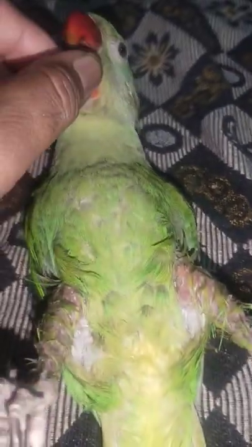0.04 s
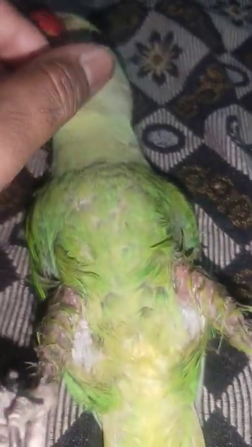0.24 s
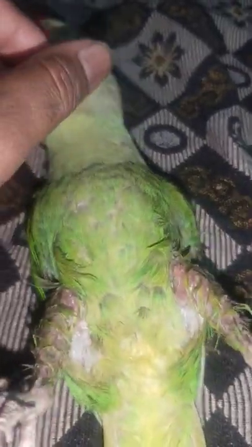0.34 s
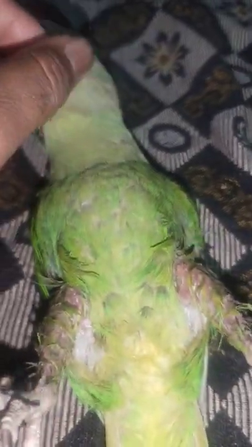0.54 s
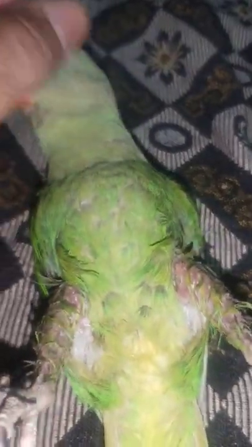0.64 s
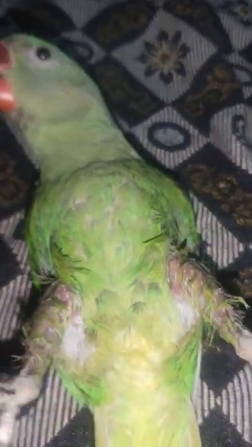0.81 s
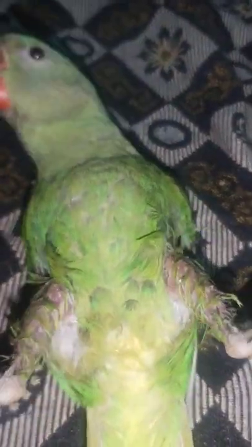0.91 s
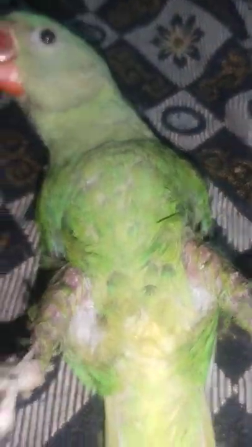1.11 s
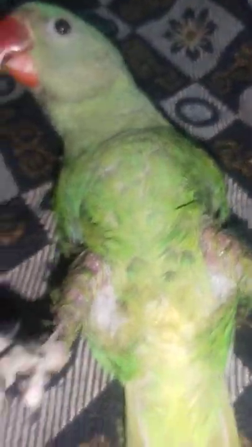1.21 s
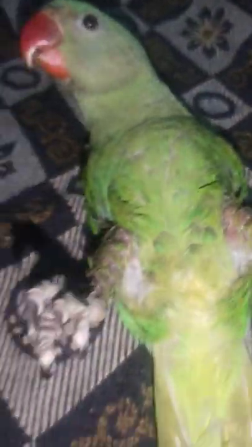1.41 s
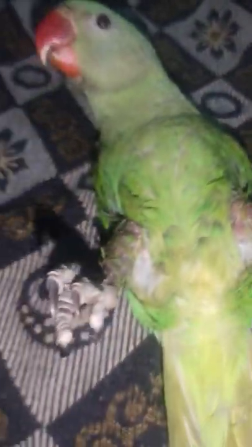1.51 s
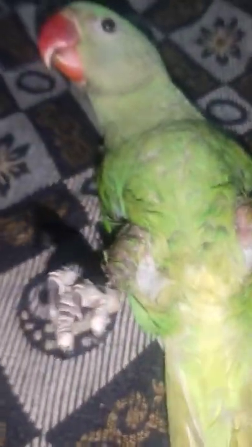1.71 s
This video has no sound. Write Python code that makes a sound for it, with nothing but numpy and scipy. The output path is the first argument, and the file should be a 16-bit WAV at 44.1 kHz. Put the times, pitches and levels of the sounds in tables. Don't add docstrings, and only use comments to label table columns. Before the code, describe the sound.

After a brief stretch of low room rumble, a parrot close to the microphone lets out one shrill, rough trilling squawk that breaks upward early, sags and stops abruptly, leaving a short room tail, soft cloth rubbing and faint distant chirps.

```python
import sys
import numpy as np
from scipy import signal
from scipy.fft import rfft, irfft
from scipy.io import wavfile
from scipy.ndimage import uniform_filter1d, map_coordinates

SR = 44100
rng = np.random.default_rng(int(sys.argv[2]) if len(sys.argv) > 2 else 0)


def ratio(d):
    e = np.asarray(d, float) / 20
    return 10 ** e


def waveform_to_disk(signal):
    frames = np.transpose(np.atleast_2d(signal))
    scaled = np.clip(frames, -1, 1) * 32767
    samples = np.round(scaled).astype(np.int16)
    wavfile.write(sys.argv[1], SR, samples)


N = 77175

# frequency_hz, density_db_per_hz
RUMBLE_SPECTRUM = [(40, -20.5), (84, 0.64), (290, -7), (1230, -10.5), (1450, -19.5), (2900, -31.5),
                   (7000, -46.5), (15500, -66)]
# frequency_hz, correlation (-1 to 1)
PORT_CORRELATION = [(60, -0.6), (130, 0.7), (290, 0.88), (640, -0.22), (1400, -0.41), (3000, 0.69),
                    (15000, -0.34)]
# frequency_hz, difference_db
PORT_LEAN = [(60, 6.5), (110, -10), (200, -2.3), (400, 3.5), (1300, 0.9), (4400, 5), (15000, 10)]
# frequency_hz, gain_db
DUCK_DEPTH = [(40, -2.5), (90, -8), (200, -16.5), (400, -20.5), (900, -15.5), (3000, -42.5), (15000, -1)]
# centre_s, length_s, level_db
RUSTLES = [
    (.1, .3, -72),
    (1.3, 0.61, -61.5),
    (1.72, 0.21, -65.5),
]
DIPS_S = [.195, .231, .269, .305, .341, .377, .413, .449, .486, .523, .561, .600, .638, .676, .714, .753,
          .793, .831, .870, .911, .945, .985]
# time_s, low_pitch_hz, high_pitch_hz, level_db, crest_level_db, crest_overtones_db,
# dip_narrowness (exponent), brightness_db (per harmonic), left_minus_right_db
VOICE = [
    (.215, 1340, 1740, -32, -2, -5, 1.0, -1, 0),
    (.262, 1580, 2350, -27, -9, -24, 2.4, 1, 0),
    (.33, 1520, 2600, -24, -16, -16, 2.8, 1, 0),
    (.352, 1480, 2330, -24, 1, -14, 2.2, 0, 0),
    (.47, 1325, 2150, -23, 0.1, -1.5, 1.1, 0.1, 0.1),
    (.60, 1280, 1990, -23, 0.1, 0.1, 1.1, 0.1, 0.1),
    (.76, 1225, 1820, -24, 0.1, 0.1, 1.15, 1.1, 0.1),
    (.89, 1200, 1670, -28, 0, 0, 1.25, 4, 3),
    (.95, 1080, 1500, -29, 0.1, 0.1, 1.2, 4.1, 3.5),
]
HARMONICS_DB = [-1, 1.9, -8.5, -16.5, -43, -22]
# frequency_hz, gain_db
FUNDAMENTAL_RESPONSE = [
    [(1100, 0.5), (1400, -4.5), (1700, -3.5), (2050, -3.2), (2350, 8)],
    [(1100, 5), (1400, -10), (1700, 6), (2000, 11), (2300, 12)],
]
# frequency_hz, gain_db
OVERTONE_RESPONSE = [
    [(2300, 0.5), (2700, -3), (3400, -1.5), (4000, -3.5), (4500, -2), (5500, -6), (6500, -1.5), (8000, -34)],
    [(2300, 3.8), (2700, 5), (3200, -4.5), (3800, 8), (4400, 0), (5500, -1), (6500, -10), (8000, -19)],
]
# frequency_hz, density_db_per_hz
AIR_SPECTRUM = [(1000, -85), (1500, -24.5), (4000, -8.5), (7300, -17), (8200, -24), (11000, -34.5),
                (15000, -35)]
# centre_s, length_s, pitch_hz, level_db, overtone_db
SQUEAKS = [
    (.294, .015, 2830, -16.5, -24),
    (.328, .017, 2830, -14.5, -20),
]
# centre_s, length_s, pitch_hz, level_db
CHIRPS = [
    (1.383, 0.035, 1894, -52),
    (1.575, 0.03, 1950, -60),
    (1.611, 0.094, 2660, -58),
    (1.67, 0.11, 1826, -54.5),
]

RUMBLE_DB, SWELL_DB, FLICKER_DB = -36.5, 1.0, 1.5
GUST_DB, GUST_TOP_HZ = 1.5, 190
HUM_HZ, HUM_WIDTH_HZ, HUM_DB = 372.8, 45, -43.5
DUCK_START_S, DUCK_IN_S, DUCK_END_S, DUCK_OUT_S = 0.18, 0.18, 0.903, 0.15
BASS_LATE_S, BASS_IN_S = 0.14, 0.079
RUSTLE_HZ, RUSTLE_WIDTH_HZ, RUSTLE_DB = 6640, 3100, 2.5
START_S, END_S, ATTACK_S, RELEASE_S = .215, .945, .002, .002
JITTER, SHIMMER_DB = .004, 1.0
SQUARE, SKEW, SKEW_PER_S = 1.1, .05, .6
FALL_DB_PER_S = 8
AIR_DB, AIR_LEFT_DB, AIR_APART = -11, -3.5, 1
AIR_PULSE, AIR_STEADY_S = .5, .33
SQUEAK_SAG_HZ_PER_S = 14000
LAG_S, TURNED_LAG_S, TURN_S, TURN_LENGTH_S = 0.00027, 0.00023, 0.698, 0.21
BED_ECHO_S, BED_ECHO_DB = (0.001016, 0.001687), -16.5
ROOM_DB, ROOM_DELAY_S, ROOM_T60_S, ROOM_TOP_HZ = (-13.5, -15.5), 0.0098, 0.63, 6500
PATCH_FROM_HZ, PATCH_WIDTH_HZ, PATCH_S, PATCH_EDGE, PATCH_DB = 7800, 450, .09, .1, -25
TOP_HZ = 15700


def level(x, db):
    return x * ratio(db) / np.sqrt(np.mean(x ** 2))


def read(table, hz):
    table = np.array(table, float)
    return np.interp(np.log(np.maximum(hz, 1)), np.log(table[:, 0]), table[:, 1])


def ramp(start_s, length_s):
    progress = np.clip((np.arange(N) / SR - start_s) / length_s, 0, 1)
    return np.sin(np.pi / 2 * progress) ** 2


def arc(centre_s, length_s):
    return np.cos(np.pi * np.clip((np.arange(N) / SR - centre_s) / length_s, -.5, .5))


def walk(rate):
    k = int(SR / rate)
    return level(uniform_filter1d(uniform_filter1d(rng.standard_normal(N), k), k), 0)


def band(hz, width_hz):
    bell = np.exp(-.5 * ((np.fft.rfftfreq(N, 1 / SR) - hz) / width_hz) ** 2)
    return level(irfft(rfft(rng.standard_normal(N)) * bell, N), 0)


def rumble():
    duck = ramp(DUCK_START_S, DUCK_IN_S) * (1 - ramp(DUCK_END_S, DUCK_OUT_S))
    bass_onset = ramp(DUCK_START_S + BASS_LATE_S, BASS_IN_S)
    swell, gust = walk(9), walk(23)
    steady, ducked = 0, 0
    for hz in 25 * 2 ** (np.arange(29) / 3):
        bass = hz < GUST_TOP_HZ
        correlation = np.clip(read(PORT_CORRELATION, hz), -.99, .99)
        mid = np.sqrt(1 + correlation) * band(hz, hz / 9)
        side = np.sqrt(1 - correlation) * band(hz, hz / 9)
        lean = ratio(read(PORT_LEAN, hz) / 2)
        pair = np.array([(mid + side) * lean, (mid - side) / lean])
        pair = pair * np.sqrt(hz)
        motion_db = SWELL_DB * swell + FLICKER_DB * walk(4) + GUST_DB * gust * bass
        pair = pair * ratio(read(RUMBLE_SPECTRUM, hz) + motion_db)
        depth = duck * bass_onset if bass else duck
        gain = ratio(read(DUCK_DEPTH, hz) * depth)
        steady = steady + pair
        ducked = ducked + pair * gain
    hum = band(HUM_HZ, HUM_WIDTH_HZ / 2) * ratio(HUM_DB + read(DUCK_DEPTH, HUM_HZ) * duck)
    return ducked * ratio(RUMBLE_DB) / np.sqrt(np.mean(steady ** 2)) + hum


def cloth_rustles():
    swell = sum(ratio(db) * arc(s, length) ** 2 for s, length, db in RUSTLES)
    ports = [swell * band(RUSTLE_HZ, RUSTLE_WIDTH_HZ) * ratio(RUSTLE_DB * walk(37)) for _ in range(2)]
    return np.array(ports)


def squeaks():
    t, out = np.arange(N) / SR, np.zeros(N)
    for s, length, hz, db, overtone_db in SQUEAKS:
        cycle = 2 * np.pi * (hz - SQUEAK_SAG_HZ_PER_S * (t - s) / 2) * (t - s)
        tone = np.sin(cycle) + ratio(overtone_db) * np.sin(2 * cycle)
        out = out + ratio(db) * arc(s, length) ** 2 * tone
    return out


def parrot():
    t, rows = np.arange(N) / SR, np.array(VOICE, float)
    courses = [np.interp(t, rows[:, 0], column) for column in rows[:, 1:].T]
    low, high, db, crest_db, thin_db, narrow, bright_db, pan_db = courses

    turn = 2 * np.pi * np.interp(t, DIPS_S, np.arange(len(DIPS_S)))
    late = np.clip(t - AIR_STEADY_S, 0, 1)
    skewed = turn + (SKEW + SKEW_PER_S * late) * (1 - np.cos(turn))
    swing = .5 - .5 * np.tanh(SQUARE * np.cos(skewed)) / np.tanh(SQUARE)
    swing = 1 - np.clip(1 - swing, 0, 1) ** narrow
    hz = (low + (high - low) * swing) * (1 + JITTER * walk(450))
    phase = 2 * np.pi * np.cumsum(hz) / SR

    gate = ramp(START_S, ATTACK_S) * (1 - ramp(END_S - RELEASE_S, 2 * RELEASE_S))
    on = gate * ratio(db + crest_db * swing ** 4 - FALL_DB_PER_S * late * np.sin(turn))
    thin = ratio(thin_db * swing ** 3)
    air_pulse = thin ** (AIR_PULSE * (1 - ramp(AIR_STEADY_S, 0.017)))
    shimmer = [ratio(SHIMMER_DB * walk(160)) for _ in HARMONICS_DB]
    shared_air = rng.standard_normal(N)
    air_colour = ratio(read(AIR_SPECTRUM, np.fft.rfftfreq(N, 1 / SR)))
    breaks = squeaks()

    out = []
    for port, air_db in enumerate((AIR_DB + AIR_LEFT_DB, AIR_DB)):
        tone = 0
        for k, source_db in enumerate(HARMONICS_DB):
            response = OVERTONE_RESPONSE[port] if k else FUNDAMENTAL_RESPONSE[port]
            gain = ratio(source_db + k * bright_db + read(response, (k + 1) * hz)) * shimmer[k]
            if k:
                gain = gain * thin
            tone = tone + gain * np.sin((k + 1) * phase + k)
        air = shared_air + AIR_APART * rng.standard_normal(N)
        rush = level(irfft(rfft(air) * air_colour, N), air_db)
        voice = on * (tone + air_pulse * rush) + breaks
        out.append(voice * ratio((.5 - port) * pan_db))
    return np.array(out)


def head_turn(left):
    lag_s = LAG_S + (TURNED_LAG_S - LAG_S) * ramp(TURN_S, TURN_LENGTH_S)
    return map_coordinates(left, [np.arange(N) - lag_s * SR], mode="nearest")


def room(x, echo_s, db):
    t = np.arange(SR) / SR
    tail = rng.standard_normal(SR) * ratio(-60 * t / ROOM_T60_S) * (t > ROOM_DELAY_S)
    tail = signal.sosfilt(signal.butter(2, ROOM_TOP_HZ, fs=SR, output="sos"), tail)
    tail = tail * ratio(db) / np.sqrt(np.sum(tail ** 2))
    bed_echo = ratio(BED_ECHO_DB) * np.roll(x, int(echo_s * SR))
    return bed_echo + signal.fftconvolve(x, tail)[:N]


def far_chirps():
    return sum(ratio(db) * arc(s, length) * band(hz, 36.6) for s, length, hz, db in CHIRPS)


def patchy(x):
    f, t, z = signal.stft(x, SR, nperseg=1024)
    lot = rng.standard_normal((int(f[-1] / PATCH_WIDTH_HZ) + 1, len(t)))
    lot = level(uniform_filter1d(lot, int(PATCH_S / t[1]), axis=1), 0)
    lot = lot[(f / PATCH_WIDTH_HZ).astype(int)]
    dropped = (lot < PATCH_EDGE) & (f[:, None] > PATCH_FROM_HZ)
    keep = np.where(dropped, ratio(PATCH_DB), 1)
    return signal.istft(z * keep, SR, nperseg=1024)[1][:, :N]


def scene():
    left, right = parrot()
    near = np.array([head_turn(left), right])
    reflected = np.array([room(x, s, db) for x, s, db in zip(near, BED_ECHO_S, ROOM_DB)])
    return near + reflected + rumble() + cloth_rustles() + far_chirps()


def band_limit(x):
    return signal.sosfilt(signal.butter(12, 15690, fs=SR, output="sos"), x)


def record(dry):
    low_pass = signal.ellip(8, .2, 70, TOP_HZ, fs=SR, output="sos")
    mix = signal.sosfilt(low_pass, patchy(dry))
    return band_limit(mix)


dry = scene()
out = record(dry)
waveform_to_disk(out)
```